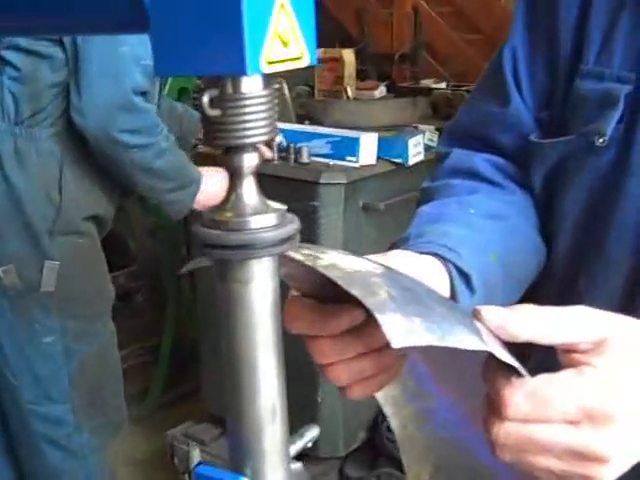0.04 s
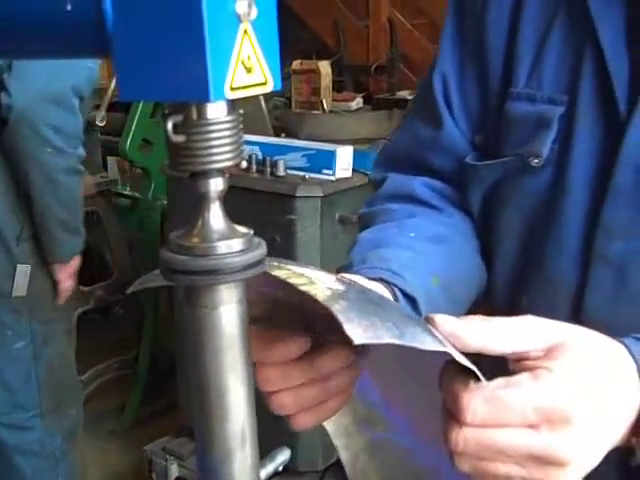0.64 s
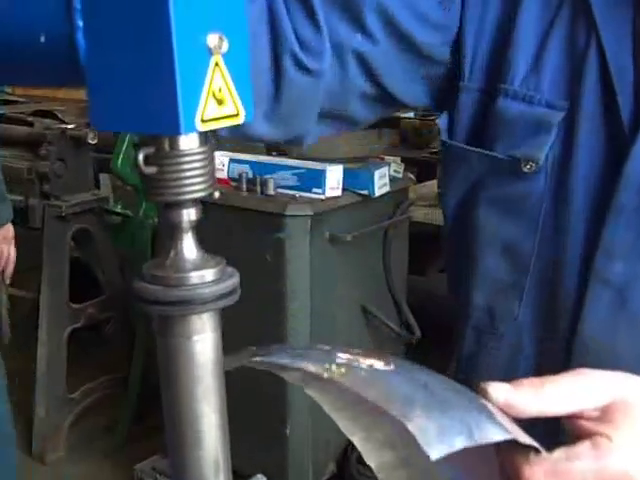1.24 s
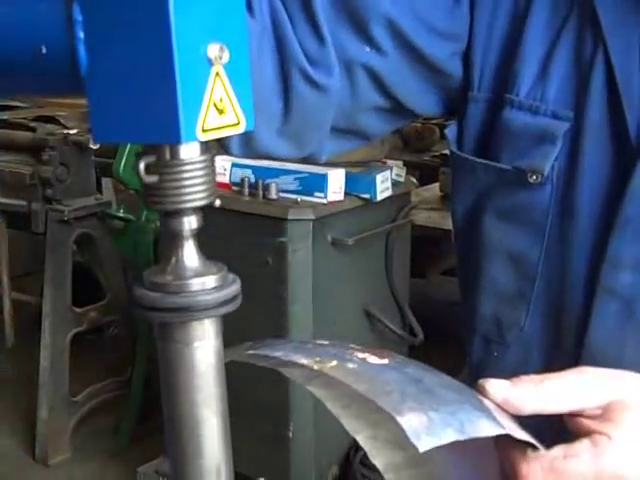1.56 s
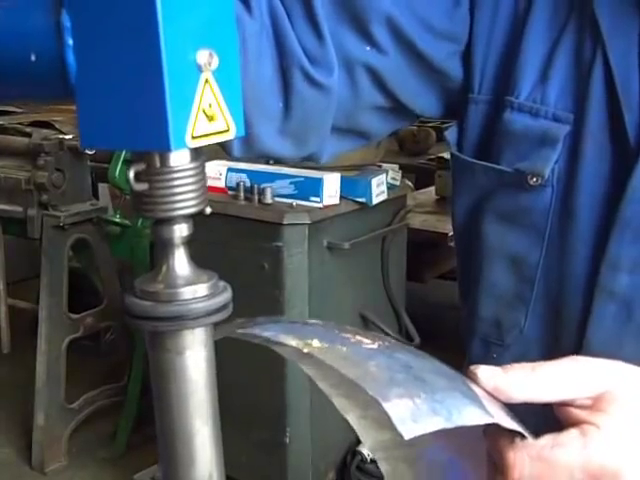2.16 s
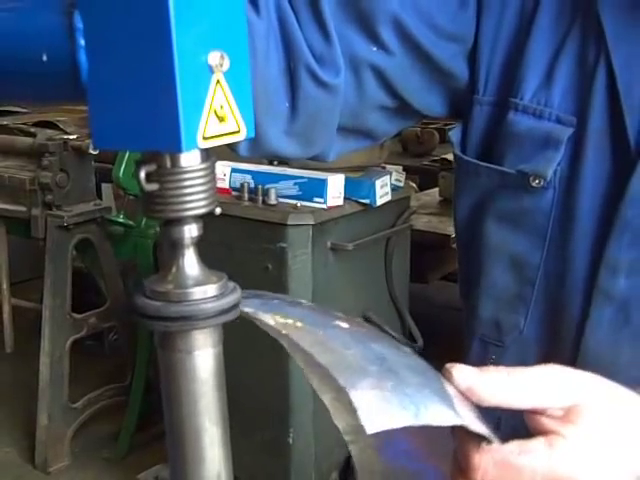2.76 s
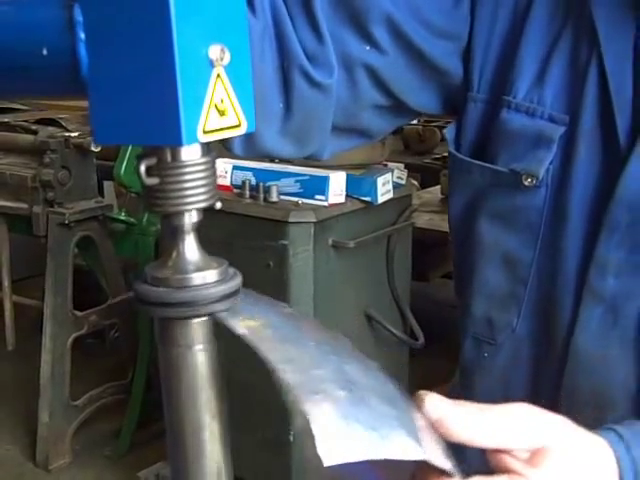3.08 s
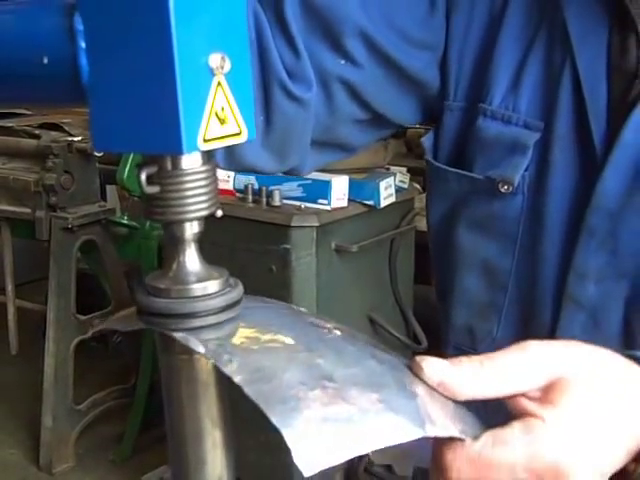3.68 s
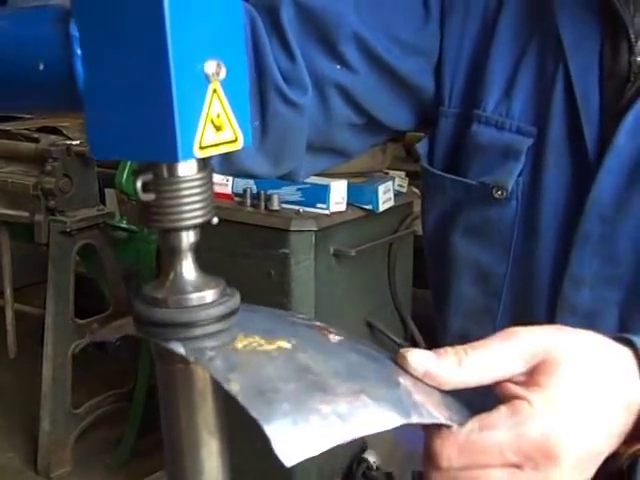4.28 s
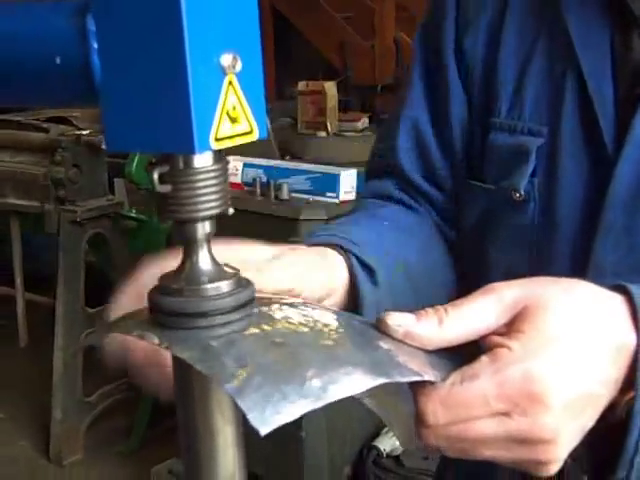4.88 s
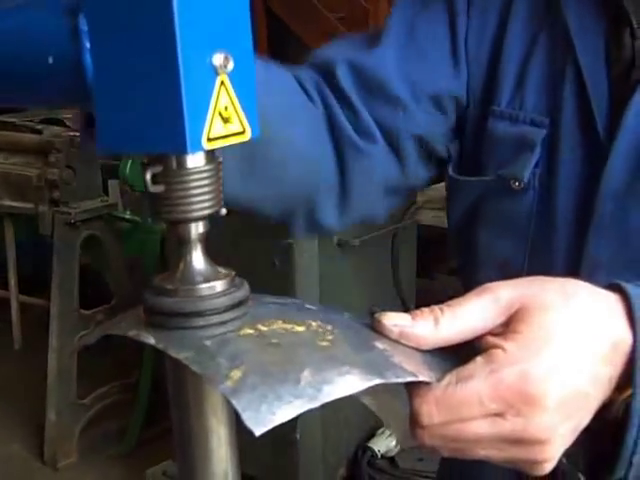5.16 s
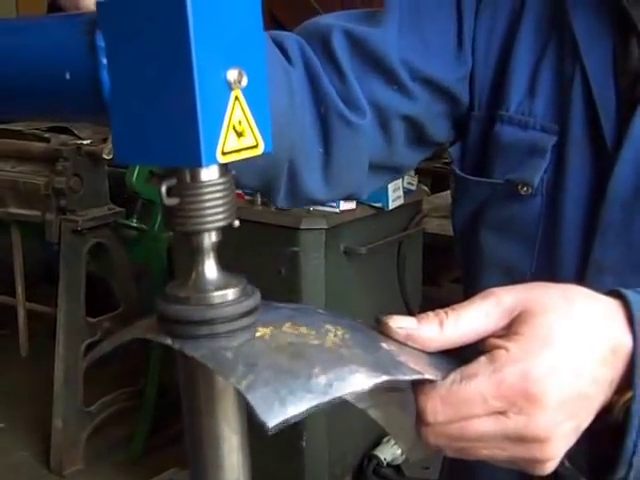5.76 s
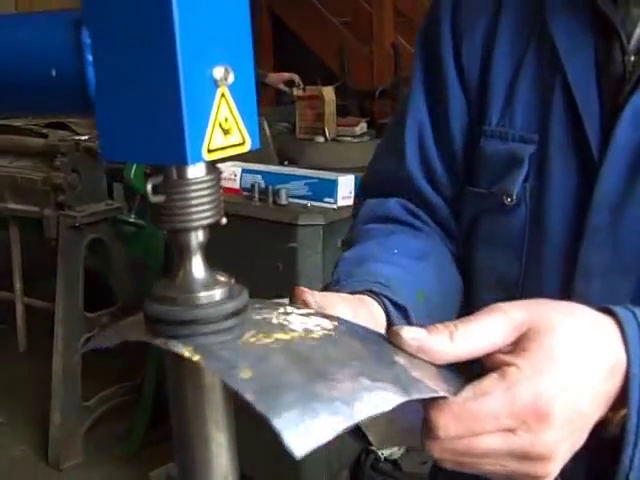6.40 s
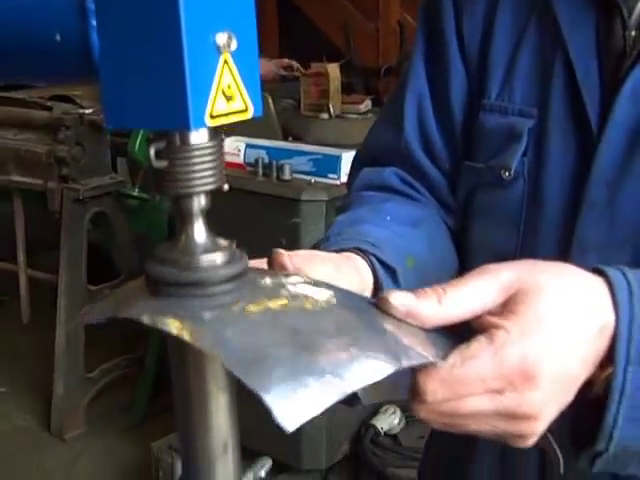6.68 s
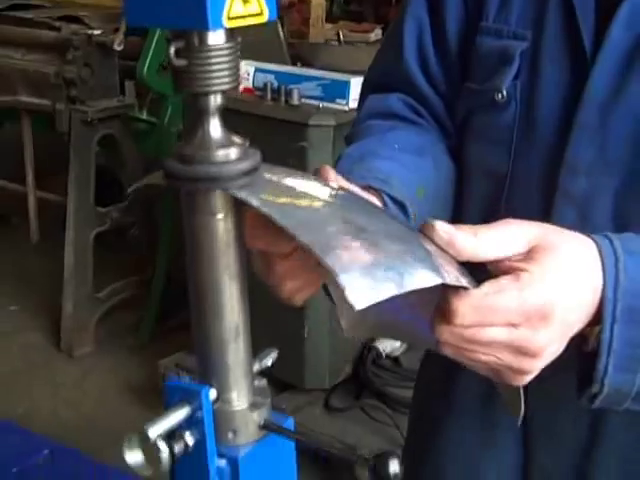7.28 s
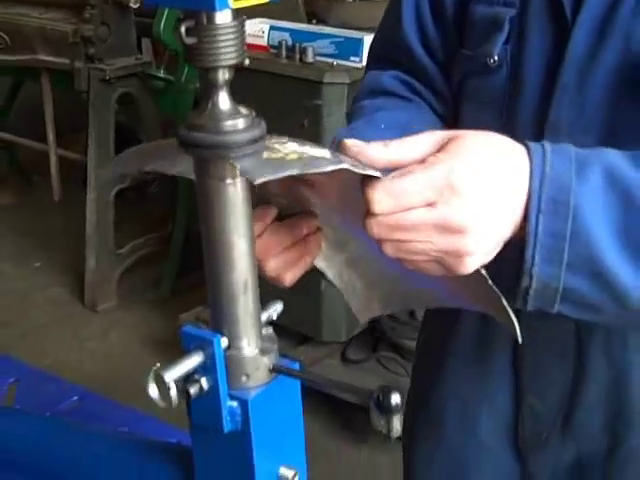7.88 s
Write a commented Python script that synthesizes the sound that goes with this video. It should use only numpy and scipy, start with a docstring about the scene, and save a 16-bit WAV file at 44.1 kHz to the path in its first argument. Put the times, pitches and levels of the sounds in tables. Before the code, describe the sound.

A sharp click starts things off, and a pneumatic hammer idles close by in a workshop, tapping lightly and quickly on a steel panel between puffs of air. The taps fade by about 1 second while the puffing continues over faint hiss. At 1.7 seconds the piston races with a surge of hissing air, then stalls by 2.3 seconds. A quiet pause follows, with several sharp metallic clicks between 3 and 3.7 seconds and a faintly ringing spring. At 4 seconds a few hard knocks and a low thump launch loud, rapid pounding on the steel, which slows to a stop at around 5 seconds. The hammer sputters, restarts unevenly at 5.4 seconds, and from about 5.8 seconds holds a very fast, steady beat until the end, near 8 seconds. The blows make a bright, rattling clang over the dull roar of an overloaded microphone.

```python
"""A metal workshop, close to a pneumatic planishing hammer working a hand-held steel panel.
The air-driven piston idles, tapping the die on the steel between puffs of exhaust, then races and stalls;
a few clicks ring the frame. It pounds, slows to a stop with ever shorter blows, and restarts into a
steady 34 blows a second: a bright clang over the dull roar of an overloaded microphone.
Air hisses underneath, and the spring around the die rings faintly."""
import sys
import numpy as np
from scipy import signal
from scipy.fft import rfft, irfft
from scipy.io import wavfile
from scipy.ndimage import uniform_filter1d

SR = 44100
rng = np.random.default_rng(int(sys.argv[2]) if len(sys.argv) > 2 else 0)


def materialize(psi):
    """Save the field psi as 16-bit PCM at rate SR to the path in sys.argv[1].

    A 1-D psi becomes a single channel; in a 2-D psi each row is a channel.
    """
    bounded = np.clip(np.atleast_2d(psi).T, -1, 1)
    quanta = np.round(bounded * 32767).astype(np.int16)
    wavfile.write(sys.argv[1], SR, quanta)


N = 350154
TIME = np.arange(N) / SR


def amp(db):
    """Decibels to linear gain."""
    return 10 ** (np.asarray(db) / 20)


def unit_rms(x):
    """The signal scaled to an RMS of one."""
    return x / np.sqrt(np.mean(x ** 2) + 1e-20)


def at_hz(points, hz):
    """A spectrum's value, read along a log-frequency axis."""
    frequencies, values = np.transpose(points)
    return np.interp(np.log(hz + 1), np.log(frequencies), values)


def curve(rows, s, column=1):
    """One column of an automation curve at the times s."""
    rows = np.array(rows)
    return np.interp(s, rows[:, 0], rows[:, column])


def add(track, s, sound):
    """Mixes a sound in at time s."""
    start = round(s * SR)
    part = track[max(start, 0):max(start + len(sound), 0)]
    part += sound[max(-start, 0):][:len(part)]


def colour(x, eq, size=4096):
    """Minimum-phase EQ with unit energy."""
    log_gain = np.log(amp(at_hz(eq, abs(np.fft.fftfreq(size, 1 / SR)))))
    response = np.exp(np.conj(signal.hilbert(log_gain)))
    taps = np.fft.ifft(response).real[:size // 2]
    return signal.oaconvolve(x, taps / np.linalg.norm(taps))[:N]


def ring(x, modes):
    """A resonator bank: decaying modes, each with its share of a unit energy."""
    t = TIME[:SR]
    taps = sum(amp(db - 60 * t / t60) / np.sqrt(t60) * np.sin(2 * np.pi * hz * t)
               for hz, db, t60 in modes)
    return signal.oaconvolve(x, taps / np.linalg.norm(taps))[:N]


def chatter(power, grain_db):
    """Dense, uneven micro-impacts that follow a power envelope."""
    flutter = unit_rms(uniform_filter1d(rng.standard_normal(N), size=30))
    grains = unit_rms(amp(grain_db * flutter))
    return np.sqrt(power) * grains * rng.standard_normal(N)


def contact(hold_s, droop_s, release_s):
    """Power envelope of one contact: it sags while it lasts, then drops away."""
    t = TIME[:SR // 4]
    return np.exp(-t / droop_s - np.maximum(t - hold_s, 0) / release_s)


def beats(pace):
    """Stroke times of the piston: one at the start, then one for each completed cycle."""
    t = np.arange(pace[0][0], pace[-1][0], 1 / SR)
    cycles = np.cumsum(curve(pace, t)) / SR
    return np.interp(np.arange(cycles[-1]), cycles, t)


def strokes(paces, forces):
    """Every stroke of the given runs: (time [s], pace [strokes/s], clang [dB], low end [dB])."""
    rows = []
    for pace, force in zip(paces, forces):
        times = beats(pace)
        rows += zip(times, curve(pace, times), curve(force, times), curve(force, times, column=2))
    return rows


def falls_on(s, pace, times):
    """Whether the stroke at s lies within half a cycle of any of the times."""
    return np.min(abs(s - np.asarray(times))) < .5 / pace


# clicks of the control and of the panel on the die:
# (time [s], level [dB], tilt [dB/octave], decay [s], send to the spring [dB])
CLICKS = [(-.002, -23.5, -2.5, 0.055, -2), (3.01, -35.5, -4, 0.0081, -3), (3.105, -53.5, -1, 0.0066, 0),
          (3.148, -49, -0.5, 0.0076, 2), (3.206, -50.5, -0.5, 0.024, 9), (3.282, -32.5, 0, 0.0076, -4),
          (3.305, -38, -2.5, 0.022, 9), (3.697, -25, -1.5, 0.0091, -12)]
# hard, mid-forward tone of a click: (frequency [Hz], gain [dB])
CLICK_EQ = [(40, -39), (350, -19), (600, -7), (850, -0.3), (1100, -11), (1700, -1.5), (3000, -4.5),
            (4600, -4), (6000, -8.5), (10000, -10.5), (16000, -21)]
# ring of the machine's frame: (frequency [Hz], level [dB], t60 [s])
FRAME_MODES = [(646, -7, 0.12), (800, -0.5, 0.19), (1150, -3, 0.21), (1423, 6, 0.13), (1710, 3, 0.14),
               (1790, -12, .12), (2580, -10, .18), (2680, -3, 0.17), (3450, -8, 0.14), (3600, -11, .14),
               (4300, 0, 0.16)]


def handling():
    """Sharp clicks ring the frame; returns their sound and the jolts that reach the spring."""
    clicks, jolts = np.zeros((2, N))
    t = TIME[:SR // 4]
    octaves = np.log2(np.clip(np.fft.rfftfreq(len(t), 1 / SR), 500, 8000) / 2000)
    for s, db, tilt_db, decay_s, jolt_db in CLICKS:
        scrape = irfft(rfft(rng.standard_normal(len(t))) * amp(tilt_db * octaves), len(t))
        click = amp(db) * scrape * np.exp(-t / decay_s)
        add(clicks, s, click)
        add(jolts, s, amp(jolt_db) * click)
    return colour(clicks, CLICK_EQ) + amp(-9) * ring(clicks, FRAME_MODES), jolts


# two close, beating tones of the spring: (frequency [Hz], level [dB], t60 [s])
SPRING_MODES = [(2482, -1, .35), (2514, 0, 1.3)]


def die_spring(jolts):
    """The spring around the die rings on faintly after each jolt."""
    return amp(-24.5) * ring(jolts, SPRING_MODES)


# decay of the room: (frequency [Hz], t60 [s])
ROOM_DECAY = [(150, 1), (1000, 0.55), (4000, 0.29), (9000, 0.19), (16000, 0.17)]


def workshop_reverb(send, predelay_s=0.0087):
    """The room answers with a diffuse tail whose treble dies first."""
    hz, t, noise = signal.stft(rng.standard_normal(SR * 3 // 4), SR, nperseg=256)
    fade = amp(-60 * t / at_hz(ROOM_DECAY, hz)[:, None])
    tail = signal.istft(noise * fade, SR, nperseg=256)[1]
    tail *= TIME[:len(tail)] > predelay_s
    return signal.oaconvolve(send, tail / np.linalg.norm(tail))[:N]


# fader ride of the background hiss: (time [s], level [dB])
HISS_LEVEL = [(0, -48), (1.6, -47.5), (1.9, -74), (2.45, -64), (3.97, -46), (4.2, -60), (7.94, -66)]
# its warm body and airy top: (frequency [Hz], gain [dB])
HISS_EQ = [(20, -18.5), (80, -8), (160, 2), (320, 0.5), (600, 0), (1500, -5), (2500, -2.5), (4000, -4.5),
           (7000, -8), (10000, -5.5), (13000, -5), (15500, 2)]


def shop_hiss():
    """A bed of noise that sits under the idle, ducks, and swells again through the long pause."""
    return amp(curve(HISS_LEVEL, TIME)) * colour(rng.standard_normal(N), HISS_EQ)


# fader ride of the leak: (time [s], level [dB])
LEAK_LEVEL = [(0, -42), (.75, -54.5), (1.5, -53), (1.66, -50.5), (1.8, -31), (2.05, -51), (2.4, -77),
              (2.6, -100)]
# its thin, bright tone: (frequency [Hz], gain [dB])
LEAK_EQ = [(40, -22.5), (200, -15.5), (600, -23), (1500, -5.5), (4000, 0.5), (7000, 2.5), (10000, 0.5),
           (13000, -0.5), (15500, -6.5)]


def valve_leak():
    """Air hisses past the open valve, surging as the piston first races."""
    return amp(curve(LEAK_LEVEL, TIME)) * colour(rng.standard_normal(N), LEAK_EQ)


# bright wash of struck steel: (frequency [Hz], gain [dB])
CLANG_EQ = [(40, -27.5), (300, -9.5), (700, -5.5), (1200, -4), (2500, -1), (5000, 1), (7000, -0.5),
            (9000, 1), (11000, -1.5), (13200, 0.5), (14500, -8), (16000, -1)]
# ring of die and panel: (frequency [Hz], level [dB], t60 [s])
STEEL_MODES = [(1390, -7, .08), (2440, -1, .13), (3278, -8, .12), (4570, -4, .15), (4630, -7, .15),
               (4840, -6, .08), (4960, -3, .2), (5283, -6, .1), (6632, -5, .1), (6890, -4, .1),
               (7127, -7, .12), (7620, -7, .1), (7890, -7, .09), (8490, -8, .06), (8820, -6, .06),
               (9168, -8, .2), (10067, -7, .1), (12085, -9, .15), (13050, -6, .06)]


def panel(drive, ring_db):
    """The steel's dense, bright clang, with its strongest modes ringing on."""
    return colour(drive, CLANG_EQ) + amp(ring_db) * ring(drive, STEEL_MODES)


# tempo of the idling piston: (time [s], pace [strokes/s])
IDLE_PACE = [(.107, 32.4), (.527, 30.16), (.988, 28.1), (1.63, 27.5)]
# how firmly the die touches the panel as it is drawn away: (time [s], level [dB])
IDLE_TOUCH = [(.13, -31), (.22, -35), (.42, -36), (.67, -39), (.77, -53), (.93, -47.5), (1.05, -58)]
# the die's own short ring under a light touch: (frequency [Hz], level [dB], t60 [s])
DIE_MODES = [(1290, 1, 0.029), (1390, 1, 0.038), (1776, -6, .06), (2430, -3, 0.11), (3740, -5, 0.036),
             (5040, 0, .04), (6100, 2, .012), (6900, -1, .05), (7850, 0, 0.04)]


def idle_taps(bounce_db=1, scatter_db=2):
    """On each idle stroke the die knocks lightly on the panel, then bounces on it."""
    bounces, knocks = np.zeros((2, N))
    times = beats(IDLE_PACE)
    levels = curve(IDLE_TOUCH, times) + scatter_db * rng.standard_normal(len(times))
    for s, db in zip(times, levels):
        add(bounces, s, amp(db + bounce_db) ** 2 * contact(hold_s=.014, droop_s=.029, release_s=.0065))
        add(knocks, s + .001, amp([db]) * np.sqrt(SR / 300))
    return panel(chatter(bounces, grain_db=1.5), ring_db=-7) + ring(knocks, DIE_MODES)


# breathy top of an exhaust puff: (frequency [Hz], gain [dB])
PUFF_EQ = [(40, -12), (150, -25), (700, -30), (1400, 4), (3000, -0.5), (6500, 2), (11000, -4), (16000, -4)]
# low body of a push of air: (frequency [Hz], gain [dB])
PUSH_EQ = [(30, -16), (100, -5), (170, 2), (300, -1.5), (600, -19), (1500, -9), (16000, -56.5)]


def exhaust(puff_db=-40, push_db=-30, width_s=.0019, lag_s=.015):
    """Midway between idle strokes the piston vents: a soft spit of air with a small low push."""
    puffs, pushes = np.zeros((2, N))
    t = TIME[:SR // 50] - .01
    for s in beats(IDLE_PACE):
        add(puffs, s + lag_s + t[0], amp(puff_db) ** 2 * np.exp(-(t / width_s) ** 2))
        add(pushes, s + lag_s, amp([push_db]))
    return colour(chatter(puffs, grain_db=-3.5), PUFF_EQ) + colour(pushes, PUSH_EQ)


# gusts on the microphone: (time [s], level [dB], length [s])
GUSTS = [(.14, -49, .13), (.88, -61, .33), (1.725, -31, .07), (1.8, -40, .1), (4.08, -27, .035),
         (4.122, -18, .028), (4.14, -37, .06)]
# their sub-heavy rumble: (frequency [Hz], gain [dB])
GUST_EQ = [(10, -1), (45, -11), (90, -17), (200, -25), (600, -32), (3000, -71)]


def gusts():
    """Moving air buffets the microphone in short, low swells."""
    swells = np.zeros(N)
    for s, db, length_s in GUSTS:
        add(swells, s, amp(db) * signal.windows.hann(round(length_s * SR)))
    return swells * colour(rng.standard_normal(N), GUST_EQ)


# single strokes as the piston stalls or catches: (time [s], clang [dB], thump [dB])
STRAY_STROKES = [(0.17, -44, -43), (0.205, -28.5, -33.5), (2.118, -37.5, -44), (2.148, -44, -52),
                 (2.19, -47, -58), (2.23, -42.5, -69), (2.269, -41.5, -64), (3.987, -38, -48),
                 (3.99, -25.5, -28), (4.006, -18.5, -25.5), (4.023, -25, -36), (4.06, -38, -24),
                 (4.067, -20, -22), (5.067, -38, -39.5), (5.078, -39, -61.5), (5.213, -39.5, -52),
                 (5.265, -51, -58), (5.407, -46, -29), (5.412, -34.5, -43)]
# dull tone of overload, on short strokes and full blows alike: (frequency [Hz], gain [dB])
ROAR_EQ = [(20, -42.5), (50, -18), (100, -7.5), (200, -2.5), (350, -0.26), (700, -1.16), (1300, -4.5),
           (2000, -7.5), (3200, -12.5), (6000, -19.5), (16000, -37.5)]


def short_strokes(hits, firm_db=-20, push_growth=0.87):
    """Each stroke gives a brief clank and a thump: a pressure pulse, a low push of air and a dull spit."""
    clanks, pulses, pushes, spits = np.zeros((4, N))
    t = TIME[:SR // 100] - .005
    for s, clang_db, thump_db in hits:
        add(clanks, s, amp(clang_db + 1.56) ** 2 * contact(hold_s=.007, droop_s=.0052, release_s=.0087))
        force_db = thump_db - firm_db
        width_s = .00026 * amp(-.14 * force_db)  # harder strokes give narrower pulses
        u = t / width_s
        pulse = unit_rms((u ** 2 - 1 + .5 * u) * np.exp(-u ** 2 / 2))
        add(pulses, s - .003, amp(thump_db - 7.5) * pulse)
        push_db = firm_db + push_growth * force_db - 8  # the push grows more slowly than the pulse
        add(pushes, s + .0013, amp([push_db]) * np.sqrt(SR / 200))
        add(spits, s, amp(thump_db - 4) ** 2 * contact(hold_s=.0044, droop_s=.0049, release_s=.0005))
    thump = pulses - colour(pushes, PUSH_EQ) + colour(chatter(spits, grain_db=7), ROAR_EQ)
    return panel(chatter(clanks, grain_db=3), ring_db=-12.5), thump


# rasp of steel slipping over the die: (frequency [Hz], level [dB], t60 [s])
RASP_MODES = [(7950, 0, .006), (8500, -1, .006)]


def panel_slide(start_s=.66, length_s=.44, level_db=-50):
    """The panel slips out from under the die with a thin rasp."""
    pressure = np.zeros(N)
    add(pressure, start_s, signal.windows.hann(round(length_s * SR)))
    return amp(level_db) * ring(chatter(pressure, grain_db=2), RASP_MODES)


# small ticks further off in the shop: (time [s], level [dB])
TICKS = [(1.072, -45), (1.325, -37.5), (1.611, -39.5), (2.516, -58.5), (2.635, -59)]
# their short ring: (frequency [Hz], level [dB], t60 [s])
TICK_MODES = [(938, -5, .035), (1100, 0.5, 0.034), (5050, -6, .04), (5300, -2.5, .035)]


def distant_ticks(trim_db=-1):
    """Tiny impacts, each ringing a few well-damped modes."""
    impacts = np.zeros(N)
    for s, db in TICKS:
        add(impacts, s, amp([db + trim_db]) * np.sqrt(SR / 250))
    return ring(impacts, TICK_MODES)


# tempo of the racing piston, one curve for each of two spurts: (time [s], pace [strokes/s])
RACE_PACE = [
    [(1.657, 38.15), (1.704, 38.22), (1.75, 66.49), (1.849, 74.39), (2.085, 46.84)],
    [(5.301, 50), (5.325, 85), (5.365, 97), (5.39, 62)],
]
# dynamics of each spurt: (time [s], clang [dB], thump [dB])
RACE_FORCE = [
    [(1.657, -31.5, -56), (1.683, -27, -44), (1.709, -23.5, -34), (1.755, -22, -24.5), (1.86, -36.5, -26.5),
     (1.91, -35, -38.5), (2.075, -39, -43.5)],
    [(5.301, -47, -49), (5.33, -38.5, -43), (5.342, -33, -26), (5.373, -37.5, -21.5), (5.387, -44, -50)],
]
# accents where the piston slams home: (time [s])
SLAMS = [1.747, 1.805, 1.834, 1.846, 1.874, 1.918]


def racing(scatter_db=.9, slam_db=10.5):
    """The piston races on short, uneven strokes, a few slamming home: (time [s], clang [dB], thump [dB])."""
    hits = []
    for s, pace, clang_db, thump_db in strokes(RACE_PACE, RACE_FORCE):
        clang_jitter, thump_jitter = scatter_db * rng.standard_normal(2)
        accent_db = slam_db * falls_on(s, pace, SLAMS)
        hits.append((s, clang_db + clang_jitter, thump_db + thump_jitter + accent_db))
    return hits


# tempo of the full blows, one run slowing to a stop, one picking up to hold: (time [s], pace [blows/s])
POUND_PACE = [
    [(4.087, 22.7), (4.189, 27.53), (4.442, 32.9), (4.595, 28.82), (4.962, 10.27)],
    [(5.432, 24.79), (5.59, 15.07), (5.684, 28.58), (5.842, 32.95), (5.99, 34.2), (6.8, 34), (7.45, 33.5),
     (7.94, 34.6)],
]
# dynamics of each run: (time [s], clang [dB], roar [dB])
POUND_FORCE = [
    [(4.087, -17, -15.5), (4.129, -21.5, -14), (4.168, -25.5, -19.5), (4.28, -27.5, -21), (4.8, -27, -22.5),
     (4.95, -29, -27.5)],
    [(5.432, -26, -21.5), (5.8, -27, -22), (6.6, -28.5, -23), (7.94, -29.5, -24)],
]


def pounding(full_pace_hz=34, scatter_db=.58, soft_blow_s=6.96, soft_blow_db=-3):
    """Each full blow rattles the panel between the dies; overload adds a dull, flat-topped roar."""
    bright, dull = np.zeros((2, N))
    for s, pace, clang_db, roar_db in strokes(POUND_PACE, POUND_FORCE):
        level_jitter, length_jitter = rng.standard_normal(2)
        # the faster the blows, the longer each rattles
        rattle_s = .032 * (pace / full_pace_hz) ** 2.2 * (1 + .14 * length_jitter)
        offset_db = scatter_db * level_jitter + soft_blow_db * falls_on(s, pace, soft_blow_s)
        add(bright, s, amp(clang_db + offset_db) ** 2 * contact(rattle_s, droop_s=.012, release_s=.0054))
        add(dull, s, amp(roar_db + offset_db) ** 2 * contact(rattle_s, droop_s=.026, release_s=.0042))
    rattle = chatter(bright, grain_db=.5)
    roar = colour(chatter(dull, grain_db=1), ROAR_EQ)
    return panel(rattle, ring_db=-25) + singing(rattle), roar


# panel modes that sing out as the grip shifts:
# (time [s], length [s], frequency [Hz], level relative to the blows [dB], t60 [s])
SINGING_MODES = [(4.21, .3, 9620, -10, .2), (4.5, .35, 9620, -14.5, .2), (5.68, 1.25, 9620, -14.5, .2),
                 (6.79, .08, 1340, -4, .025), (6.95, .08, 1340, -2, .025), (7.08, .45, 9620, -16, .2),
                 (7.63, .1, 1450, -2, .02), (7.7, .4, 9620, -14.5, .2)]


def singing(rattle, taper=.48):
    """A mode of the panel swells and fades while the grip leaves it free."""
    tones = np.zeros(N)
    for s, length_s, hz, db, t60 in SINGING_MODES:
        swell = np.zeros(N)
        add(swell, s, signal.windows.tukey(round(length_s * SR), taper))
        tones += amp(db) * swell * ring(rattle, [(hz, 0, t60)])
    return tones


def scene():
    """The mono mix: steel and clicks fill the room; roar and thumps stay up close."""
    clang, roar = pounding()
    clank, thump = short_strokes(STRAY_STROKES + racing())
    clicks, jolts = handling()
    clicks_and_ticks = clicks + distant_ticks()
    taps = idle_taps()
    puffs_and_rasp = exhaust() + panel_slide()
    spring = die_spring(amp(6) * (clank + puffs_and_rasp) + amp(3) * jolts + amp(-1) * taps)
    details = clicks_and_ticks + puffs_and_rasp
    send = amp(-2) * clang + amp(-6) * clank + amp(-18) * taps + amp(-14) * details + amp(-21) * thump
    room = workshop_reverb(send)
    air = shop_hiss() + valve_leak() + gusts()
    return (clang + roar + clank + thump + taps + details + spring + room + air)[None]


def record(dry):
    """Soft overload rounds the peaks, then a steep low-pass trims the very top."""
    ceiling, cutoff_hz = .8, 15850
    saturated = ceiling * np.tanh(dry / ceiling)
    lowpass = signal.firwin(511, cutoff_hz, window=("kaiser", 9), fs=SR)
    return signal.oaconvolve(saturated, lowpass[None], "same")


dry = scene()
out = record(dry)
materialize(out)
```